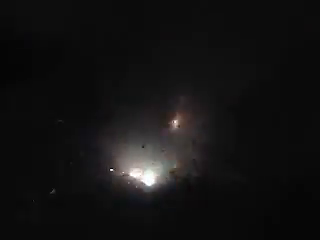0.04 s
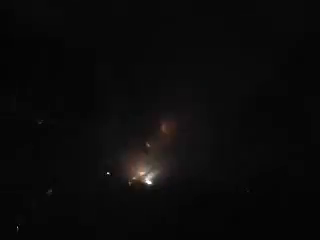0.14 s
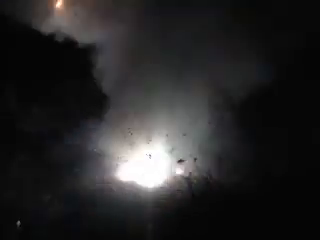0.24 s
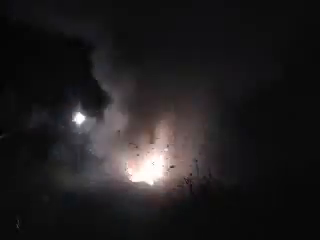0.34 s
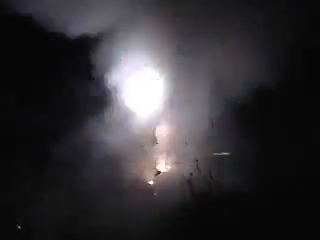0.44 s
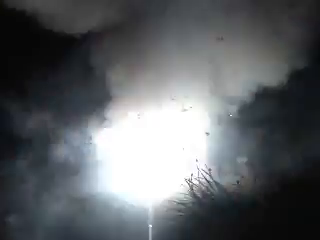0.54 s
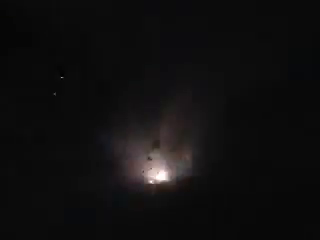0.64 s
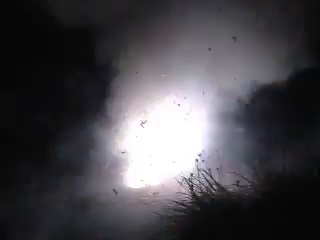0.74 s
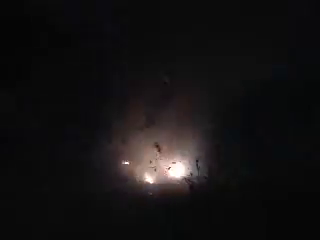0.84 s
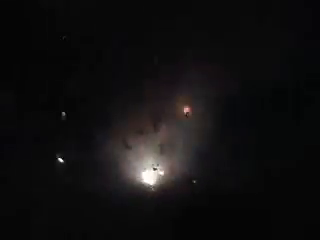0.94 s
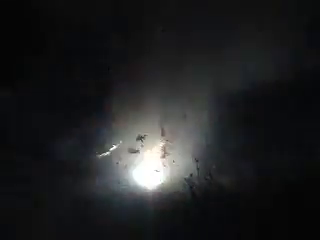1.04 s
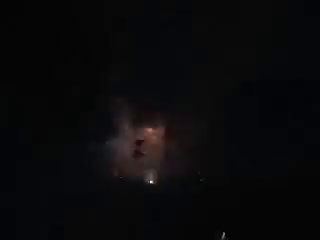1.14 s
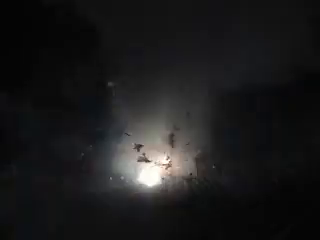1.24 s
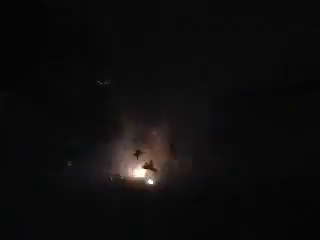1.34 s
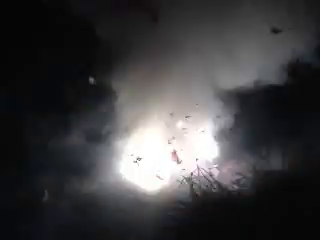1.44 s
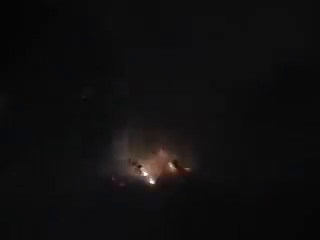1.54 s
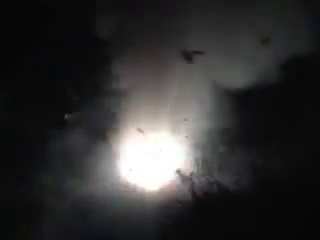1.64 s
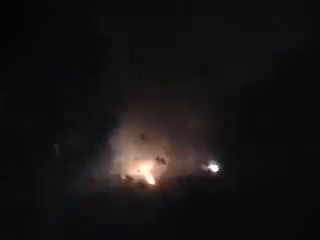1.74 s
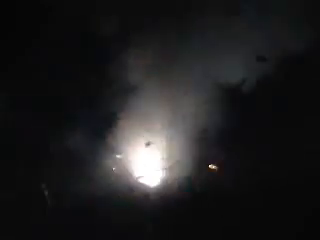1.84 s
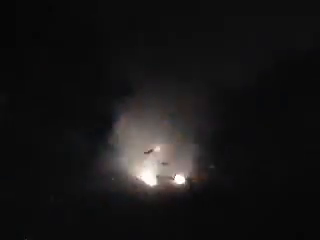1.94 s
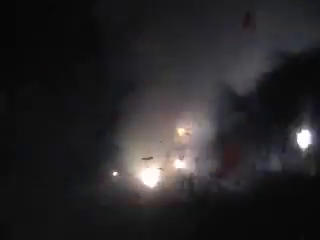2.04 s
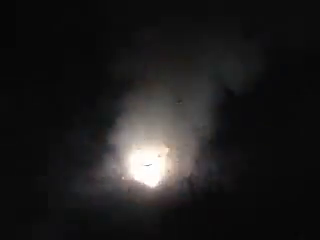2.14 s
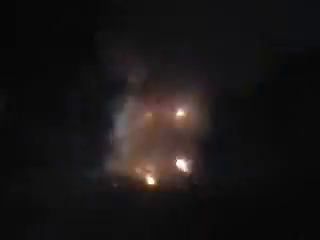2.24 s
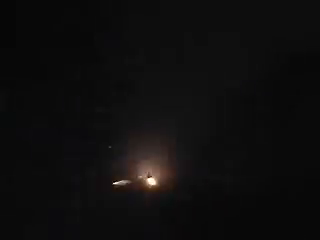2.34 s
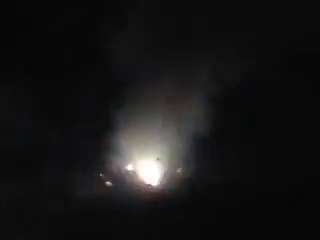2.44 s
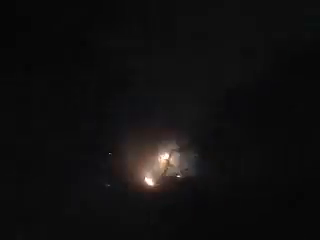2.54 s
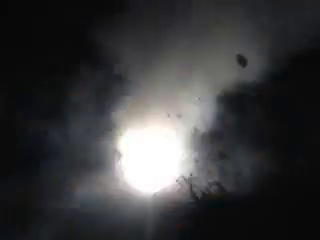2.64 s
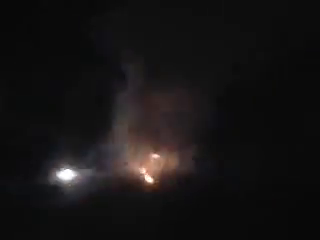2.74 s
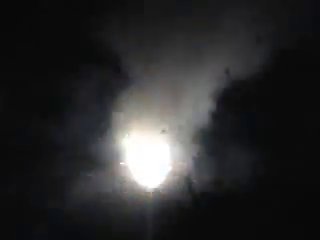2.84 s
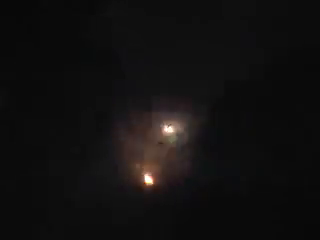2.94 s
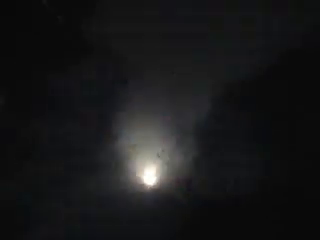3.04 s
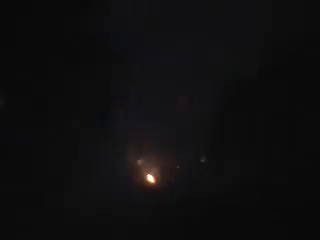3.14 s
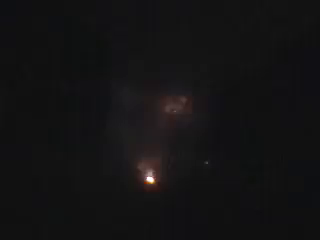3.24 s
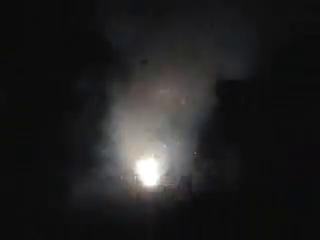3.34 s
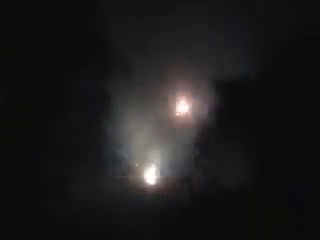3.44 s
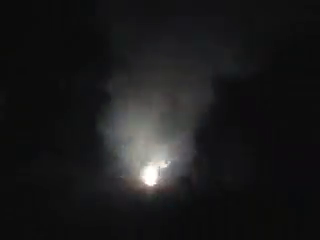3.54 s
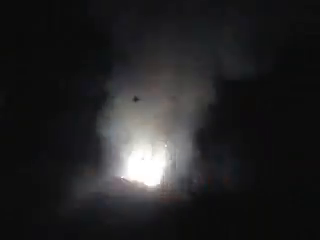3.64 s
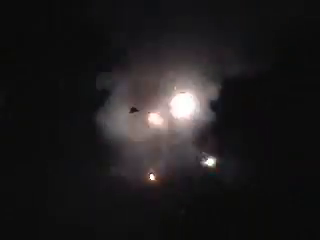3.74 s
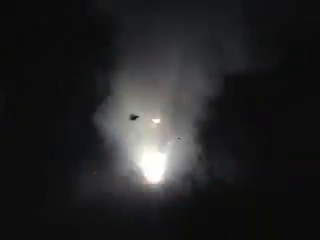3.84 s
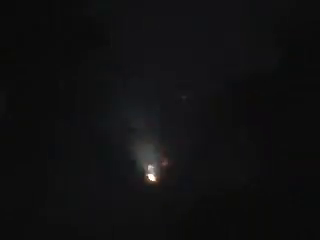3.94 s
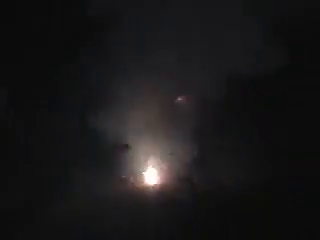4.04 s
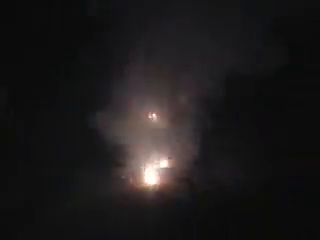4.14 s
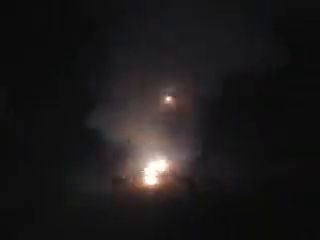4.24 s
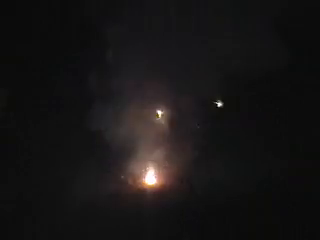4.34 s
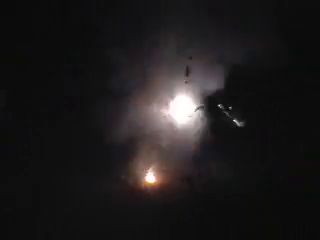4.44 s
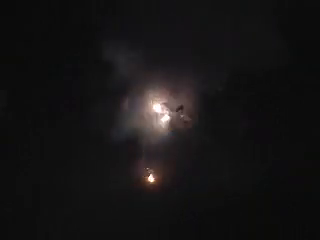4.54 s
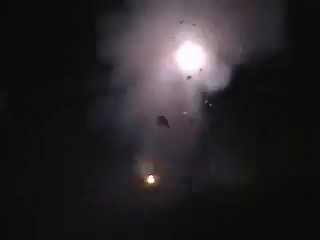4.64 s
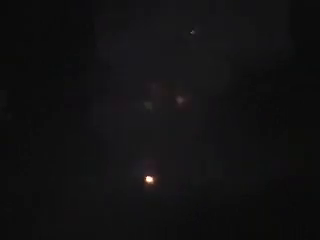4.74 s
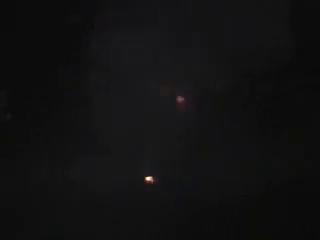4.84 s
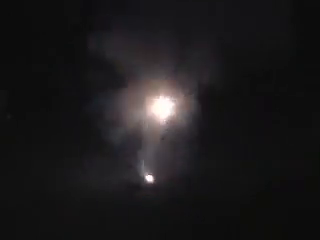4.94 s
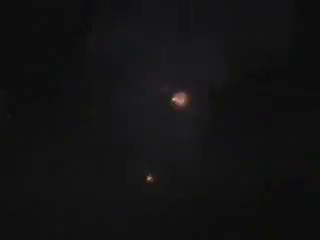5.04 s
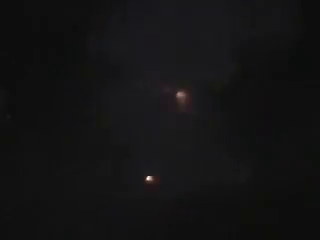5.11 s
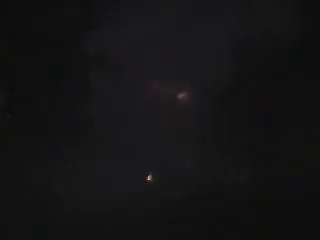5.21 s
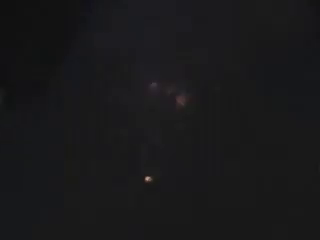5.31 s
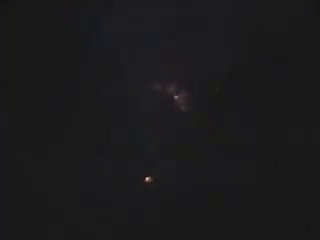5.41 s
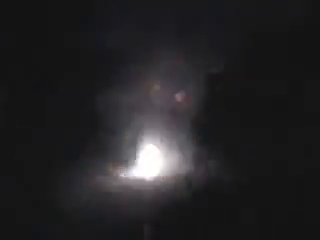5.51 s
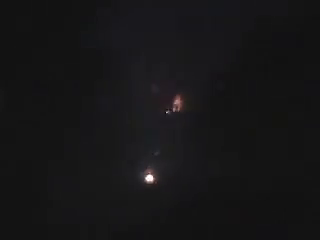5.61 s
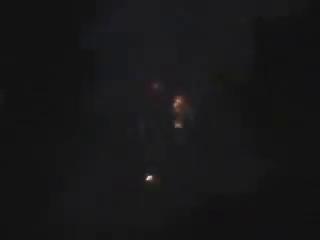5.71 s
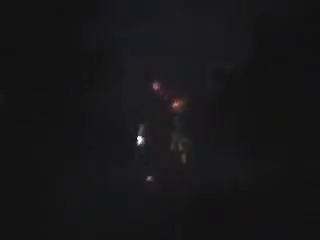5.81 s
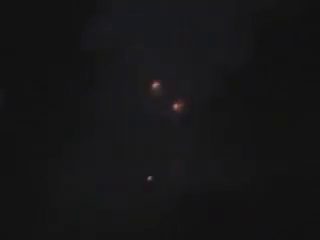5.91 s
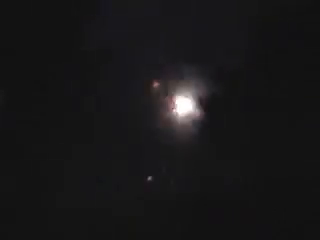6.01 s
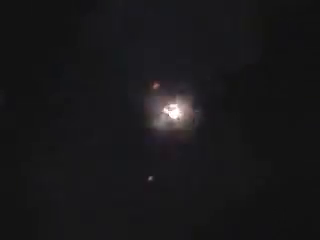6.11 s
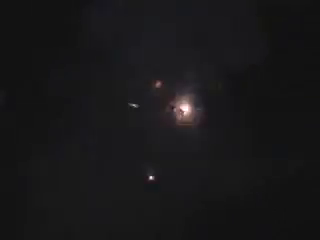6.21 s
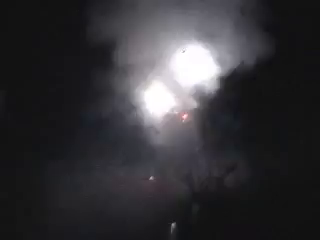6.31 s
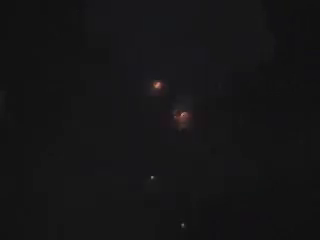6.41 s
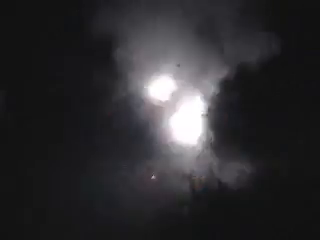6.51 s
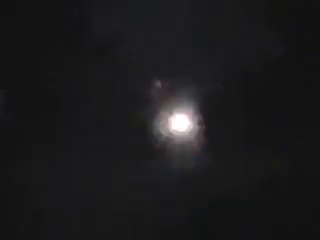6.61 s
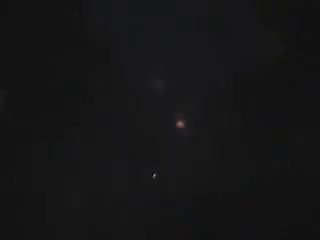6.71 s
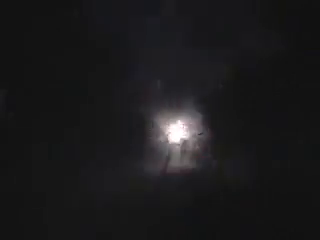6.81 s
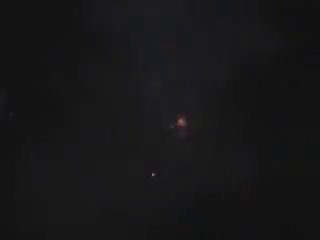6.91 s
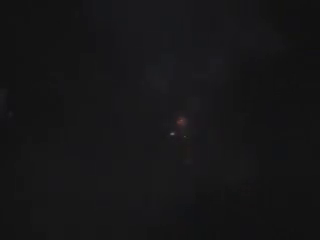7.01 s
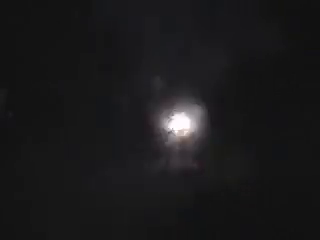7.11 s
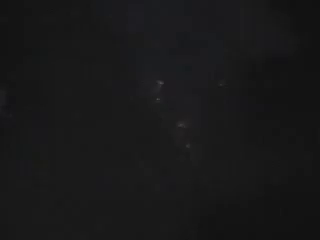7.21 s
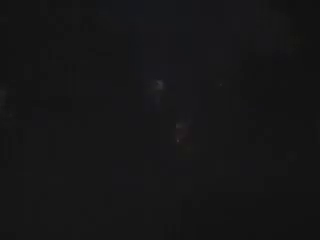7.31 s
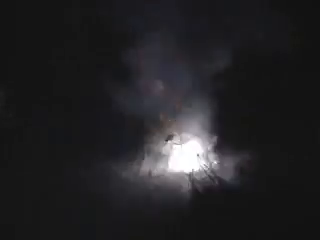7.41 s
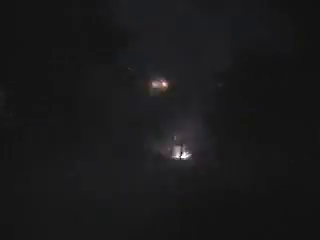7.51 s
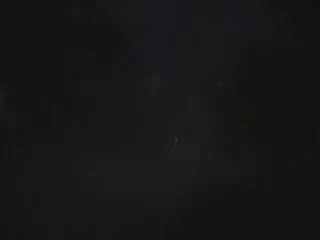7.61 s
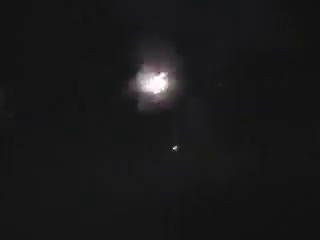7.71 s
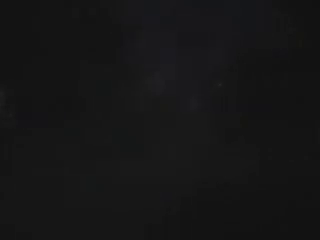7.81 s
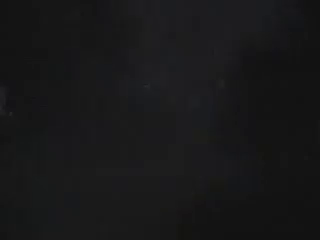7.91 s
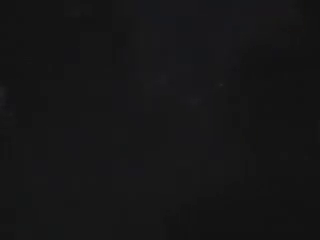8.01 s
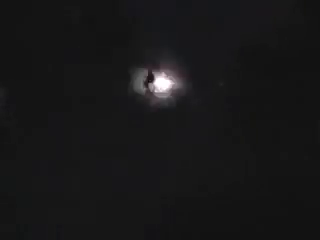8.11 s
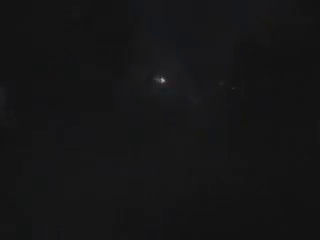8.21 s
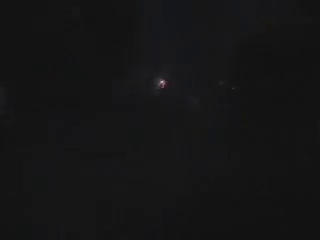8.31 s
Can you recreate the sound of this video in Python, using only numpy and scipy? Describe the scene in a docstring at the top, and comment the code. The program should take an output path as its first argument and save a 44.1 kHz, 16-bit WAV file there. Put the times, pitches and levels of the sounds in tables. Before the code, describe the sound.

Outdoors at night, a long firecracker string is already burning at full force, its bangs fused into a loud, wide rattle with tiny dips. After about two seconds it loosens, and by four only irregular single cracks and small clusters remain, each with a short thump, dull echo and noisy roll from trees. The microphone limits hard, flattening peaks and giving a boxy, slightly distorted sound.

```python
"""A long string of firecrackers burns down outdoors: first an unbroken rattle with brief dips in level
and a wide roar of merged reflections, then, as both thin out, scattered single bangs to the end.
Each bang is noise bursts a few ms long plus a blast-wave thump; ground and bushes nearby scatter it,
a dull smeared echo follows, and the trees further off roll it back as noise that swells and sinks.
A slow limiter and flattened peaks hold the level."""
import sys
import numpy as np
from scipy import signal
from scipy.fft import rfft, irfft, next_fast_len
from scipy.io import wavfile
from scipy.ndimage import uniform_filter1d

SR = 44100
rng = np.random.default_rng(int(sys.argv[2]) if len(sys.argv) > 2 else 0)


def unload_audio(sound):
    """Save the sound as a 16-bit wav file, at the path given as the first command line argument."""
    columns = np.transpose(np.atleast_2d(sound))
    # keep every value between -1 and 1, then stretch to whole-number steps
    steps = np.round(np.clip(columns, -1, 1) * 32767)
    wavfile.write(sys.argv[1], SR, steps.astype(np.int16))


N = 368676

# width of scatter and roll, before each layer's offset: f/Hz, side re mid/dB
FAR_WIDTH = [(100, -26), (400, -40), (1000, -60), (2500, -60), (4500, -22), (7000, -11), (11000, -6)]


def from_db(db):
    """Amplitude ratio from dB."""
    return 10 ** (np.asarray(db) / 20)


def rms_one(x):
    """Scale to rms 1, over all channels together."""
    return x / np.sqrt(np.mean(x ** 2) + 1e-20)


def in_time(rows):
    """Each column of a t/s table, interpolated sample by sample."""
    t_s, *columns = np.transpose(rows)
    return [np.interp(np.arange(N) / SR, t_s, column) for column in columns]


def at_hz(points, f_hz):
    """A spectrum table interpolated on a log-frequency axis."""
    table_hz, value = np.transpose(points)
    return np.interp(np.log(f_hz + 1), np.log(table_hz), value)


def noise(spectrum, width, side_db):
    """Stereo noise, rms 1: independent mid and side, coloured in the frequency domain."""
    size = next_fast_len(N)
    f_hz = np.fft.rfftfreq(size, 1 / SR)
    mid, side = rfft(rng.standard_normal((2, size))) * from_db(at_hz(spectrum, f_hz))
    side = side * from_db(at_hz(width, f_hz) + side_db)
    left_right = irfft([mid + side, mid - side], size)[:, :N]
    return rms_one(left_right)


def flicker(per_s, depth_db):
    """Random gain, rms 1: independent dB values, per_s of them a second, joined by straight lines."""
    steps = np.arange(N) / SR * per_s
    values = rng.standard_normal(N // 8)
    return rms_one(from_db(depth_db * np.interp(steps, np.arange(N // 8), values)))


def delayed(x, delay_s):
    """Shift later, silence first."""
    return np.interp(np.arange(N) - delay_s * SR, np.arange(N), x, left=0)


def fade(energy, t60_s):
    """Each energy impulse leaves an exponential tail that starts at the impulse's height."""
    # 60 dB of energy is a factor of 1e-6, reached after t60_s; the pole gives exactly that decay
    return signal.lfilter([1], [1, -10 ** (-6 / (t60_s * SR))], energy + 1e-18)


def impulses(t_s, energy):
    """One energy impulse for each bang."""
    return np.bincount(np.clip(t_s * SR, 0, N - 1).astype(int), energy, N)


def fuse():
    """Burning string: bangs per second and their level, with brief smooth dips in level."""
    # t/s, rate/(bangs per s), level/dB (relative)
    burn = [(0, 133, -11.5), (1.9, 120.3, -9.5), (2.3, 91, -10), (2.85, 72, -10), (3.25, 37.6, -13),
            (3.75, 25, -13), (4.1, 7.9, -21.5), (8.36, 3.8, -32)]
    # middle t/s, length/s (full width at 1/e of the dB depth), depth/dB
    lulls = [(0.52, 0.02, 8), (0.668, 0.083, 7), (1.257, .02, 10), (2.084, 0.027, 10.5), (2.171, .025, 16),
             (2.434, 0.062, 12), (3.008, 0.029, 8), (3.254, 0.032, 19), (3.404, 0.065, 8),
             (3.673, 0.027, 10)]
    per_s, level_db = in_time(burn)
    t_s = np.arange(N) / SR
    for middle_s, length_s, depth_db in lulls:
        level_db = level_db - depth_db * np.exp(-(2 * (t_s - middle_s) / length_s) ** 2)
    return per_s, level_db


def fuse_bangs(level_db, spread_db, thump_db, scatter_db):
    """Random bangs along the string; rows of t/s, crack/dB, thump/dB, scatter/dB."""
    per_s, fuse_db = fuse()
    chance = rng.standard_normal((2000, 3))
    # gamma gaps of mean 1: more even than fully random ones
    due = np.cumsum(rng.gamma(2, .5, len(chance)))
    burnt = np.cumsum(per_s) / SR   # bangs so far
    at = np.searchsorted(burnt, due[due < burnt[-1]])
    spread = spread_db * chance[:len(at)]
    db = fuse_db[at, None] + level_db + spread + [0, thump_db, scatter_db]
    return np.column_stack([at / SR, db])


def single_bangs():
    """Listed bangs; a stronger crack scatters more; rows of t/s, crack/dB, thump/dB, scatter/dB."""
    # bangs that stand out: t/s, crack level/dB, thump level/dB (both relative)
    bangs = [(0.2137, -8, -17), (0.353, -2, -22), (0.55, 1, -21), (0.6304, -2, -16), (0.6564, -10, -8),
             (0.9112, -13, -15), (0.993, -4, -16), (1.0397, -7, -18), (1.202, -6, -15), (1.2693, 4, -16),
             (1.306, -6, -22), (1.9747, 8, -15), (2.0386, -11, -10), (2.21, -1, -11), (2.234, -15, -30),
             (2.3288, -11, -11), (2.4243, -7.5, -10), (2.4699, -6, -6), (2.5065, -9, -17),
             (2.646, -15, -23), (2.7226, 7, -22), (2.7326, -3, -22), (2.7815, -13, -12), (2.8437, -11, -14),
             (2.8651, -8, -5), (2.8783, -2, -20), (2.9272, -13, -26), (2.9624, -13, -8), (3.0173, -8, -5),
             (3.0867, -6, -17), (3.0996, -7, -27), (3.1232, -8, -15), (3.18, -8, -14), (3.1934, -9, -13),
             (3.2108, -8.5, -18), (3.2858, -3, -7), (3.303, -5, -24), (3.3253, -8, -13), (3.351, -8, -16),
             (3.397, -11.5, -9), (3.4362, -7.5, -17), (3.468, 7, -22), (3.486, -1, -15), (3.5105, -5, -14),
             (3.522, -8, -16), (3.555, -8, -19), (3.5797, -5, -15), (3.6086, -8.5, -26), (3.6453, -11, -16),
             (3.6531, -20, -14), (3.691, -4, -17), (3.7282, -7, -36), (3.7537, -6, -12),
             (3.8228, -4.5, -25), (3.8401, -4, -28), (3.8684, -14, -15), (3.9184, -5, -13),
             (3.928, -14, -19), (3.9427, -8.5, -25), (3.9883, -4.5, -8), (4.1107, -4.5, -10),
             (4.1526, -5.5, -14), (4.2182, -4, -15), (4.247, -9, -8), (4.2703, -9, -16), (4.3118, -7, -16),
             (4.3186, -5, -20), (4.3362, -5, -17), (4.3756, -4.5, -18), (4.4028, -10, -20),
             (4.4388, -7, -18), (4.52, -6.5, -20), (4.5426, -4.5, -18), (4.5685, -11, -11),
             (4.6187, -5.5, -23), (4.6486, -6.5, -18), (4.6685, -3, -16), (4.6929, -8, -20),
             (4.7344, -5, -16), (4.7873, -8.5, -12), (4.8114, -3, -19), (4.8215, -7, -20),
             (4.866, -7.5, -28), (4.8961, -8, -47), (4.912, -8.5, -26), (5.004, -1, -21),
             (5.0138, -11, -32), (5.0219, -7, -46), (5.032, -11, -25), (5.0405, -8, -38), (5.1339, -4, -24),
             (5.1545, -24, -26), (5.1819, -5, -20), (5.23, -7, -25), (5.2494, -8.5, -35),
             (5.2754, 2.5, -16), (5.329, -7.5, -26), (5.3385, -6, -25), (5.367, -9.5, -16),
             (5.46, -1.5, -13), (5.473, -4, -29), (5.5375, -6.5, -25), (5.576, -11, -11), (5.591, -5, -9),
             (5.6308, -10, -11), (5.655, -4.5, -15), (5.7958, -3, -38), (5.8758, -4, -12),
             (5.9002, -8.5, -17), (5.9298, -9.5, -24), (5.9545, -8, -12), (5.9612, -1, -12),
             (6.0541, -7.5, -11), (6.107, -7.5, -7.5), (6.1227, -8.5, -25), (6.1349, -7, -8),
             (6.148, 2, -18), (6.2154, -8, -17), (6.2316, -2, -12), (6.262, -6.5, -20), (6.2898, -9, -36),
             (6.3028, -7.5, -37), (6.4099, -4, -6), (6.4251, -7.5, -9), (6.5253, -4.5, -16),
             (6.6078, -5.5, -22), (6.618, -5, -19), (6.6317, -6, -22), (6.6757, -7.5, -9),
             (6.7092, -7.5, -24), (6.8685, 0, -6), (6.8846, -11, -26), (6.9103, -6.5, -21), (6.95, -1, -8),
             (6.9725, -5.5, -18), (7.0564, -6, -18), (7.145, -7.5, -28), (7.1708, -5, -15),
             (7.2204, -8, -44), (7.2576, -8, -9), (7.271, -8.5, -19), (7.2833, -7.5, -28),
             (7.4377, -3.5, -2), (7.4504, -9, -20), (7.4646, -6.5, -35), (7.5002, -9, -13),
             (7.516, -9.5, -16), (7.565, -7, -18), (7.5872, -7, -22), (7.603, -5, -8), (7.6921, -7.5, -16),
             (7.7660, -8.5, -8), (7.8199, -5, -7), (7.8272, -9, -22), (7.852, -9, -22), (7.9873, -1.5, -19),
             (8.2175, 2.5, -5)]
    t_s, crack_db, thump_db = np.transpose(bangs)
    scatter_db = -8 + 0.73 * crack_db
    return np.column_stack([t_s, crack_db, thump_db, scatter_db])


def cracks(t_s, db, spectrum, length_at_minus_6_db_s, log_length_per_db, front_db, front_s, drive,
           bounce_share, side_db):
    """Sharp shock front, then a noise burst held at a steady level and quickly released;
    its length depends on its level, up to 4.8 ms."""
    # width of the direct sound, before the offset: f/Hz, side re mid/dB
    near_width = [(100, -7.5), (250, -6.5), (600, -25), (1200, -49.5), (2500, -34.5), (5000, -24.5),
                  (10000, -20)]
    age_s = np.arange(SR // 60) / SR
    out = np.zeros((2, N + len(age_s)))
    hiss = np.pad(noise(spectrum, near_width, side_db), ((0, 0), (0, len(age_s))), "wrap")
    front = 1 + from_db(front_db) * np.exp(-age_s / front_s)
    lags = rng.integers(5, 45, 3000)   # samples
    for start, level_db, lag in zip((t_s * SR).astype(int), db, lags):
        span = slice(start, start + len(age_s))
        burst = hiss[:, span]
        # ground bounce: its lag, random here, goes with the height of the bang and colours it
        bounced = burst + bounce_share * np.roll(burst, lag, axis=1)
        burst = rms_one(np.tanh(drive * bounced))
        length_s = length_at_minus_6_db_s * np.exp(log_length_per_db * (level_db + 6))
        hold = 1 / np.sqrt(1 + (age_s / min(length_s, .0048)) ** 8)
        out[:, span] += from_db(level_db) * burst * front * hold
    return out[:, :N]


def thumps(t_s, db, mean_push_s, mean_bounce_s, mean_bounce_share, side_db, low_hz, high_hz, left_re_right_db):
    """Blast wave: a sharp push, a longer suction, and a bounce that differs between the channels."""
    age_s = np.arange(SR // 50) / SR
    out = np.zeros((2, N + len(age_s)))

    def blast(after_s, push_s):
        phase = np.maximum(age_s - after_s, 0) / push_s
        return (age_s >= after_s) * (1 - phase) * np.exp(-phase)

    chance = rng.uniform(.6, 1.4, (3000, 4))
    for start, level, (size, late, across, gain) in zip((t_s * SR).astype(int), from_db(db), chance):
        push_s = mean_push_s * size
        bounce = mean_bounce_share * gain * blast(mean_bounce_s * late, push_s)
        mid = blast(0, push_s) + bounce
        side = from_db(side_db) * np.sign(gain - 1) * blast(mean_bounce_s * across, push_s)
        out[:, start:start + len(age_s)] += level * np.array([mid - side, mid + side])
    band = signal.butter(2, [low_hz, high_hz], "band", fs=SR, output="sos")
    return signal.sosfilt(band, out[:, :N]) * from_db([[left_re_right_db / 2], [-left_re_right_db / 2]])


def scatter(t_s, db, t60_s, echo_s, echo_energy_share, echo_t60_s, echo_smear_s):
    """Bushes and ground return a lumpy decaying spray; one rough surface a dull, smeared echo."""
    # spray spectrum: f/Hz, density/dB (relative)
    spray_spectrum = [(40, -6), (110, -11.5), (200, -2), (400, -7.5), (600, -2.5), (900, -2.5), (1600, 1),
                      (2800, -2), (5000, -6.5), (8000, -6.5), (12000, -13)]
    # echo spectrum, short of bass and treble: f/Hz, density/dB (relative)
    echo_spectrum = [(50, -28), (250, -6), (600, -5), (1100, -2.5), (1800, 1.5), (2800, -2), (4500, -12),
                     (12000, -18)]
    energy = impulses(t_s, from_db(db) ** 2)
    spray = np.sqrt(fade(energy, t60_s)) * noise(spray_spectrum, FAR_WIDTH, side_db=-23.0)
    late_energy = delayed(fade(energy, echo_t60_s), echo_s)
    smeared = np.abs(uniform_filter1d(late_energy, int(echo_smear_s * SR) + 1))
    echo = np.sqrt(echo_energy_share * smeared) * noise(echo_spectrum, FAR_WIDTH, side_db=-9.0)
    return (spray + echo) * flicker(per_s=490, depth_db=2.0)


def roll(t_s, db, t60_s, treble_t60_s, delay_s, steady_share):
    """Echoes from the trees swell after bangs and sink in pauses, the treble faster than the rest."""
    # roll spectrum: f/Hz, density/dB (relative)
    roll_spectrum = [(30, -53), (120, -12.5), (200, -9.5), (400, -9), (600, -7.5), (900, 0.5), (1800, 1.5),
                     (2800, 0.5), (5000, -4), (8000, -6), (12000, -14)]
    energy = delayed(impulses(t_s, from_db(db) ** 2), delay_s)
    # fullest at the start, then settling
    settled_db, extra_db, settle_s = -19.5, 5.5, 2.44
    roll_db = settled_db + extra_db * np.exp(-np.arange(N) / SR / settle_s)
    air = noise(roll_spectrum, FAR_WIDTH, side_db=2.0) * from_db(roll_db)
    body = signal.sosfiltfilt(signal.butter(2, 3500, fs=SR, output="sos"), air)
    treble = air - body

    def swell(decay_s):
        tail = fade(energy, decay_s)
        # relative to the mean over 1 s around
        return np.sqrt(steady_share + tail / uniform_filter1d(tail, SR))

    return body * swell(t60_s) * flicker(per_s=250, depth_db=3.0) + treble * swell(treble_t60_s)


def roar(crowding=1.58):
    """Reflections from all sides merge into wide noise that fades faster than the bang rate falls."""
    # roar spectrum: f/Hz, density/dB (relative)
    roar_spectrum = [(30, -33), (70, -14), (130, -5.5), (250, 0.5), (450, -6), (900, -4), (1800, -1),
                     (3600, 0.5), (5000, -3.5), (9000, -5), (12000, -11.5)]
    # roar width, before the offset: f/Hz, side re mid/dB
    roar_width = [(40, -14), (130, 2), (300, 0.5), (650, 0), (1200, -1.5), (2200, -9), (4000, -4),
                  (7000, -9.5), (11000, -2)]
    per_s, fuse_db = fuse()
    merged = (per_s / per_s.max()) ** crowding
    return from_db(fuse_db) * merged * noise(roar_spectrum, roar_width, side_db=-2.5)


def scene():
    """Listed and random bangs share the crack, snap, thump and echo mechanisms; the roar is added."""
    # burst spectra: f/Hz, density/dB (relative)
    crack_spectrum = [(150, -13), (300, -8), (500, -5.5), (900, 1.5), (1700, 1), (2600, 2), (3800, 1),
                      (5000, -3.5), (8000, -2), (10500, -4), (13000, -22.5)]
    snap_spectrum = [(300, -9), (1000, 3.5), (3000, -5), (5000, 2.5), (8000, -3.5), (10500, -9.5),
                     (13000, 0.5)]
    mass = fuse_bangs(level_db=2.0, spread_db=3.0, thump_db=-7.0, scatter_db=-5)
    t_s, crack_db, thump_db, scatter_db = np.vstack([single_bangs(), mass]).T
    # the crack lengthens with level, the snap shortens
    crack = cracks(t_s, crack_db, crack_spectrum, length_at_minus_6_db_s=0.0059, log_length_per_db=0.3,
                   front_db=5.0, front_s=0.00041, drive=0.1, bounce_share=0.49, side_db=2.0)
    snap = cracks(t_s, crack_db, snap_spectrum, length_at_minus_6_db_s=0.0032, log_length_per_db=-0.3,
                  front_db=6.5, front_s=0.00077, drive=.2, bounce_share=0.3, side_db=16.5)
    thump = thumps(t_s, thump_db, mean_push_s=0.00063, mean_bounce_s=0.00078, mean_bounce_share=0.31,
                   side_db=-14.5, low_hz=70.5, high_hz=900, left_re_right_db=-3.0)
    near = scatter(t_s, scatter_db, t60_s=0.16, echo_s=.018, echo_energy_share=0.83,
                   echo_t60_s=0.061, echo_smear_s=0.0094)
    far = roll(t_s, crack_db, t60_s=11.0, treble_t60_s=1.1, delay_s=0.04, steady_share=0.15)
    direct = from_db(-4.0) * crack + from_db(-6.5) * snap + from_db(8.0) * thump
    return direct + from_db(-1.5) * near + from_db(-1.8) * far + from_db(1.0) * roar()


def limiter(x, threshold_db, attack_s, release_db_per_s):
    """Gain follows the averaged level, too slow to catch the front of a bang; linear dB release."""
    keep = np.exp(-1 / (attack_s * SR))
    power = signal.lfilter([1 - keep], [1, -keep], np.mean(x ** 2, axis=0))
    excess_db = np.maximum(10 * np.log10(power + 1e-9) - threshold_db, 0)
    # running maximum on a rising ramp = peak hold that falls at the release rate
    ramp_db = release_db_per_s * np.arange(N) / SR
    return x * from_db(ramp_db - np.maximum.accumulate(excess_db + ramp_db))


def record(dry):
    """Microphone housing resonances, bass cut, limiter, peaks flattened towards 0.85, steep top end."""
    # housing resonances: f/Hz, width/Hz, gain/dB
    housing = [(403, 68, 5), (587, 135, 6), (1690, 62, 1.5)]
    for f_hz, width_hz, gain_db in housing:
        peak = signal.iirpeak(f_hz, f_hz / width_hz, fs=SR)
        dry = dry + (from_db(gain_db) - 1) * signal.lfilter(*peak, dry)
    dry = signal.sosfilt(signal.butter(2, 38, "high", fs=SR, output="sos"), dry)
    loud = limiter(dry, threshold_db=-7.5, attack_s=.011, release_db_per_s=138)
    flattened = loud / (1 + (loud / .85) ** 4) ** .25
    return signal.sosfiltfilt(signal.ellip(8, .1, 45, 12000, fs=SR, output="sos"), flattened)


dry = scene()
out = record(dry)
unload_audio(out)
```